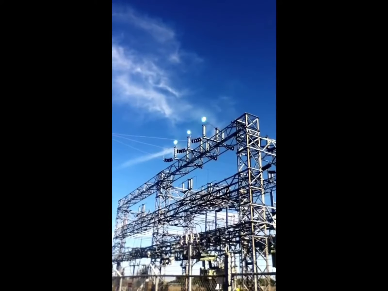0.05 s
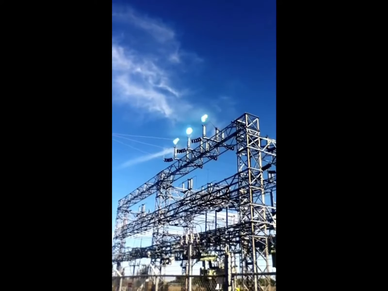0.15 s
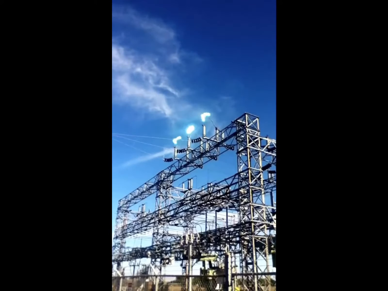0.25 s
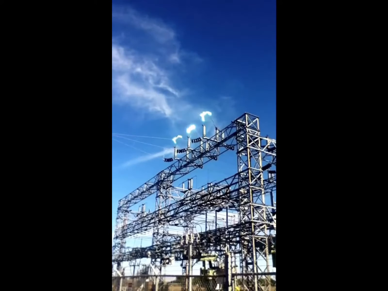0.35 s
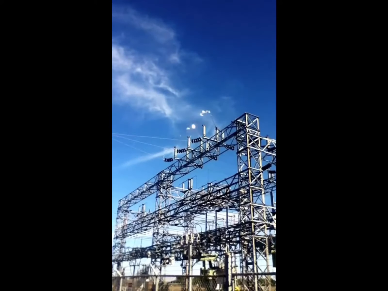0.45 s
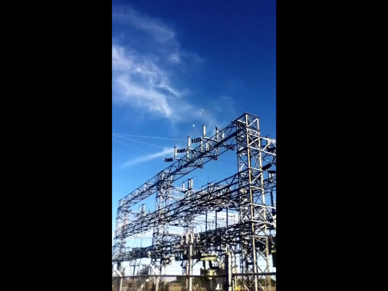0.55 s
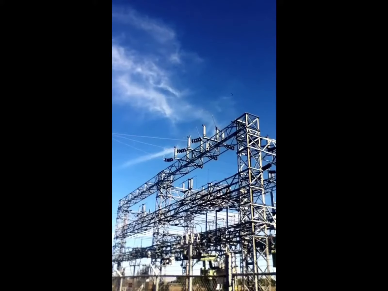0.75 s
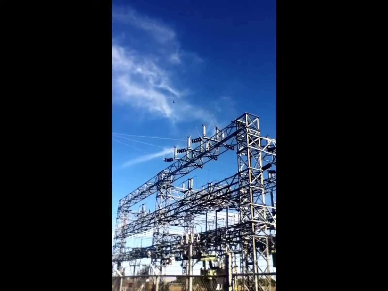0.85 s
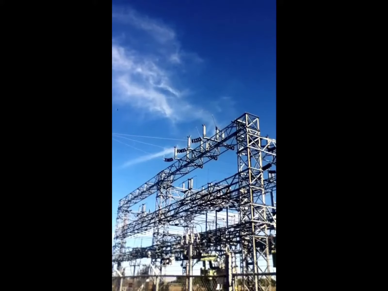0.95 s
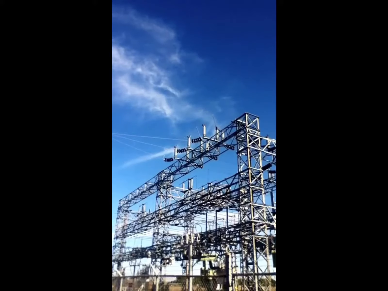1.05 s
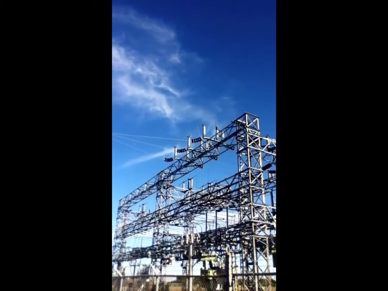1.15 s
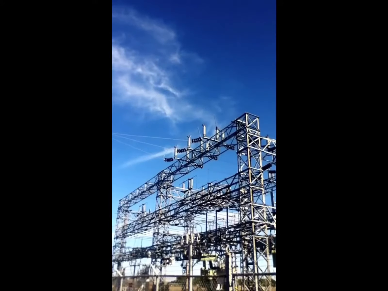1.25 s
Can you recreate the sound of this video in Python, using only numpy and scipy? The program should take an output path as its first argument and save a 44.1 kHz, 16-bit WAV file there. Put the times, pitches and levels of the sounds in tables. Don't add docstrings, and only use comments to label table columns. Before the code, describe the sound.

Metal switch blades scrape and squeal, then a loud electric arc buzzes and abruptly cuts out

```python
import sys
import numpy as np
from scipy import signal
from scipy.fft import rfft, irfft
from scipy.io import wavfile
from scipy.ndimage import uniform_filter1d

SR = 44100
rng = np.random.default_rng(int(sys.argv[2]) if len(sys.argv) > 2 else 0)


def dump_mix(stems):
    frames = np.atleast_2d(stems).T
    limited = np.clip(frames, -1, 1)
    pcm = np.round(limited * 32767).astype(np.int16)
    wavfile.write(sys.argv[1], SR, pcm)


def level_to_linear(level):
    exponent = np.asarray(level, float) / 20
    return 10 ** exponent


N = 57330
T = np.arange(N) / SR


def curve(rows):
    return level_to_linear(np.interp(T, *np.array(rows).T))


def unit(x):
    return x / np.sqrt(np.mean(x ** 2))


def noise():
    return rng.standard_normal(N)


def resonate(x, hz, width):
    b, a = signal.iirpeak(hz, hz / width, SR)
    return signal.lfilter(b, a, signal.lfilter(b, a, x))


def lowpass(x, hz, order):
    return signal.sosfilt(signal.butter(order, hz, fs=SR, output="sos"), x)


def tint(x, rows):
    hz, db = np.array(rows).T
    f = np.fft.rfftfreq(N, 1 / SR) + 1
    gain = level_to_linear(np.interp(np.log(f), np.log(hz), db, left=-60, right=-75))
    return unit(irfft(rfft(x) * gain, N))


def walk(rate):
    k = int(SR / rate)
    return unit(uniform_filter1d(uniform_filter1d(noise(), k), k))


def decay(t, t60):
    return np.exp(-np.log(1000) * t / t60)


def air():
    # (frequency [Hz], density [dB per Hz])
    air_colour = [(30, -8.5), (150, 1.5), (400, -7.5), (1300, -8.5), (2000, -19.5), (8000, -25),
                  (13000, -30), (14200, -34)]
    whine = level_to_linear(-66) * np.sin(2 * np.pi * 14994 * T)
    return level_to_linear(-47.5) * tint(noise(), air_colour) + whine


def traffic():
    # (frequency [Hz], density [dB per Hz])
    traffic_colour = [(35, -32), (60, -40), (139, -7.5), (373, -2), (559, -15), (621, -7), (1050, -10),
                      (1150, -11.5), (4000, -34), (5200, -76), (8800, -120)]
    # (time [s], level [dB])
    traffic_level = [(0, -36.5), (.05, -40.5), (.12, -41.5), (.22, -42), (.4, -39.5), (.8, -49), (1.3, -58)]
    return curve(traffic_level) * level_to_linear(0.8 * walk(15)) * tint(noise(), traffic_colour)


def insects():
    # (time [s], length [s], level [dB])
    chirps = [
        (0.962, 0.037, -61),
        (1.007, 0.026, -60),
        (1.065, 0.012, -59),
    ]
    hz, width_hz = 4850, 900
    band = unit(resonate(noise(), hz, width_hz))
    out = level_to_linear(-60.5 + 2 * walk(40)) * band
    for t0, length, db in chirps:
        swell = np.sin(np.pi * np.clip((T - t0) / length, 0, 1))
        glide = np.sin(2 * np.pi * (4750 * T - 3000 * (T - t0) ** 2))
        out = out + level_to_linear(db + 6) * swell * (glide + 0.5 * band)
    return out


def burst(t0, length):
    u = (T - t0) / length
    rise = np.clip(u / 0.12, 0, 1)
    sag = level_to_linear(-4 * np.clip(u, 0, 1))
    release = np.clip((1.2 - u) / 0.32, 0, 1)
    return rise * sag * release


def scrape(grit):
    # (frequency [Hz], density [dB per Hz])
    scrape_colour = [(240, -48), (400, -4), (768, -11), (1250, -7.5), (1540, -12.5), (1970, -8),
                     (2250, -9.5), (4130, -10), (15000, -33.5)]
    # (time [s], level [dB])
    scrape_level = [(.15, -55), (.187, -41), (.194, -36), (.207, -32), (.245, -37), (.28, -36), (.34, -35),
                    (.41, -36), (.46, -44)]
    return tint(grit, scrape_colour) * curve(scrape_level) * (T < 0.5)


def squeals():
    # (time [s], length [s], frequency [Hz], wander [Hz], level [dB])
    rings = [
        (.173, .036, 2035, 8, -33),
        (.207, .085, 2010, 25, -36),
        (.204, .02, 5260, 25, -38),
        (.215, .1, 1690, 20, -44),
        (.2, .07, 580, 40, -44),
        (.308, .025, 5170, 80, -43),
        (.365, .09, 1890, 40, -42),
        (.397, .045, 7504, 25, -44),
        (.5, .07, 2000, 15, -46),
    ]
    out = 0
    for t0, length, hz, wander, db in rings:
        cycles = np.cumsum(hz + wander * walk(121)) / SR
        gain = level_to_linear(db + 4.6 + min(wander / 10, 2.5) * walk(150))
        out = out + gain * burst(t0, length) * np.sin(2 * np.pi * cycles)
    return out


def rasps(grit):
    # (time [s], length [s], centre [Hz], width [Hz], level [dB])
    rasp_rows = [
        (.163, .015, 2400, 900, -46),
        (.204, .02, 3300, 3000, -38),
        (.325, .015, 5500, 4000, -42),
        (.125, .02, 2200, 1500, -55),
        (.265, .14, 10500, 6000, -47),
        (.4, .03, 8000, 3000, -46),
    ]
    out = 0
    for t0, length, hz, width, db in rasp_rows:
        out = out + level_to_linear(db) * burst(t0, length) * unit(resonate(grit, hz, width))
    return out


def ticks():
    # (time [s], peak level [dB], centre [Hz], t60 [s])
    tick_rows = [(.1925, -29, 10000, .004), (.205, -19, 5000, .006), (.2515, -23, 5500, .002),
                 (.2715, -19, 4000, .002), (.346, -24, 5500, .002), (.67, -29, 6000, .008),
                 (.768, -22, 200, .03), (.774, -36, 11000, .004), (.808, -42, 7000, .006),
                 (.9315, -31, 5500, .012), (.954, -36, 4500, .035), (1.127, -39, 4500, .012)]
    out = 0
    for t0, db, hz, t60 in tick_rows:
        fade = decay(np.clip(T - t0, 0, 1), t60) * (T >= t0)
        click = resonate(fade * noise(), hz, hz * 1.9)
        click = lowpass(click, min(hz * 1.7, 18000), order=3)
        out = out + level_to_linear(db) * click / np.abs(click).max()
    return out


def blades():
    grit = noise() * level_to_linear(2.4 * rng.exponential(size=N) + 1.5 * walk(90))
    return scrape(grit) + squeals() + rasps(grit) + ticks()


def arc_tone(phase):
    # (multiple of the buzz [1], loudest time [s], peak [dB], rise [dB/s], fall [dB/s])
    overtones = [(1, .69, -14.5, 55, 70), (2, .57, -22, 170, 110), (3, .54, -22.5, 90, 115),
                 (4, .48, -38, 50, 250), (4, .72, -36, 90, 20), (5, .63, -43, 15, 10),
                 (6, .55, -35, 50, 250), (6, .76, -41, 300, 20), (7, .46, -39, 120, 45),
                 (7, .76, -41, 300, 20), (9, .73, -44, 120, 40), (11, .42, -38, 150, 45),
                 (12, .72, -35, 70, 100), (13, .705, -33, 50, 200), (14, .66, -45, 50, 100),
                 (17, .54, -50, 150, 150)]
    # (time [s], length [s], change [dB])
    stumbles = [
        (.54, .012, 1.5),
        (.571, .01, -2),
        (.671, .014, -3),
        (.75, .03, -5),
        (.768, .012, 2),
    ]
    knee_s, drift_rad, wobble_db = 0.035, 0.2, 1.6
    spread_rad = 2.3
    tone = 0
    for k, top, db, rise, fall in overtones:
        d = T - top
        slope = np.where(d < 0, rise, fall) * (np.sqrt(d ** 2 + knee_s ** 2) - knee_s)
        loose = min(round(k) - 1, 2)
        spread = spread_rad * (round(k) - 1) * (round(k) - 2) / 2
        wave = np.cos(round(k) * phase + spread + loose * drift_rad * walk(17))
        tone = tone + level_to_linear(db - slope + wobble_db * walk(23) * loose / 2) * wave
    sag = 0
    for t0, length, db in stumbles:
        sag = sag + db * np.exp(-2 * ((T - t0) / (length / 2)) ** 2)
    uneven = 1 + 0.07 * np.cos(phase / 2 + 1)
    ignition = 1 / (1 + np.exp((0.385 - T) / 0.015))
    return tone * level_to_linear(-3 + sag + 0.9 * walk(195)) * uneven * ignition


def arc_hiss(phase):
    # (time [s], level [dB])
    hiss_level = [(.38, -62), (.46, -40.5), (.52, -32.5), (.6, -32), (.66, -31.5), (.7, -29.5), (.745, -26),
                  (.776, -27)]
    # (centre [Hz], width [Hz], level [dB], growth [dB/s])
    hiss_peaks = [(190, 200, 3, 8), (450, 500, 2, -15), (800, 700, 1, -10), (1500, 300, -2, 5),
                  (3350, 350, -4, 35), (4580, 250, -1, -5), (5850, 450, -6, 45), (8150, 600, -3, -3),
                  (4500, 7000, 0, 3), (10500, 2500, -14, 3)]
    depth, power = 0.4, 1.2
    gate = 1 - depth + depth * 2 * ((1 + np.cos(phase)) / 2) ** power
    new_cycle = np.diff(np.floor(phase / (2 * np.pi)), prepend=0).clip(0, 1)
    strikes = unit(new_cycle * level_to_linear(0.83 * walk(100)))
    hiss = 0
    for hz, width, db, growth in hiss_peaks:
        drive = (gate if hz > 1000 else 1) * noise()
        drive = drive + level_to_linear(-8) * strikes * (hz > 2000 and width < 1000)
        gain = level_to_linear(db + growth * (T - 0.65) + 1.2 * walk(30))
        hiss = hiss + gain * unit(resonate(drive, hz, width * 1.5))
    return curve(hiss_level) * unit(lowpass(hiss, 10500, order=4))


def arc():
    buzz_hz, first_peak_s = 119.85, 0.6053
    snap_s, snap_fall_s = 0.776, 0.0013
    phase = 2 * np.pi * buzz_hz * (T - first_peak_s)
    alive = 1 / (1 + np.exp(np.clip((T - snap_s) / snap_fall_s, -50, 50)))
    return arc_tone(phase) * alive, arc_hiss(phase) * alive


def echoes(sound):
    # (delay [s], level [dB], top [Hz])
    walls = [
        (.0417, -7, 4500),
        (.1877, -22, 800),
        (.2629, -24, 800),
        (.459, -28, 400),
    ]
    out = 0
    for lag, db, hz in walls:
        out = out + level_to_linear(db) * np.roll(lowpass(sound, hz, order=1), round(lag * SR)) * (T > lag)
    return out


def yard(sound):
    tail = noise() * decay(T, 0.45)
    tail = lowpass(tail / np.sqrt(np.sum(tail ** 2)), 9000, order=1)
    return level_to_linear(-11) * signal.fftconvolve(sound, tail)[:N]


def scene():
    floor = air() + traffic() + insects()
    metal = blades()
    tone, hiss = arc()
    direct = tone + hiss + metal
    return (floor + direct + echoes(tone + hiss) + yard(hiss + metal))[None]


def band_limit(x):
    return signal.sosfilt(signal.butter(12, 15700, fs=SR, output="sos"), x)


def record(dry):
    x = signal.sosfilt(signal.butter(2, 45, "high", fs=SR, output="sos"), dry)
    x = signal.sosfilt(signal.ellip(10, 0.2, 70, 15650, fs=SR, output="sos"), x)
    return band_limit(x)


dry = scene()
out = record(dry)
dump_mix(out)
```